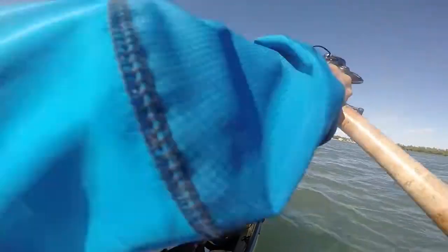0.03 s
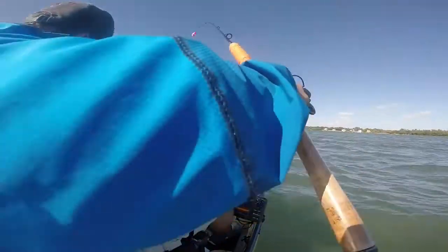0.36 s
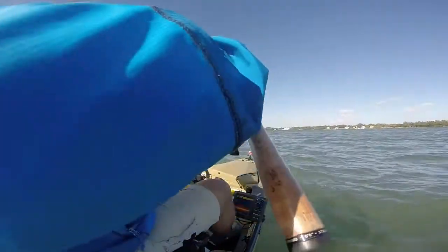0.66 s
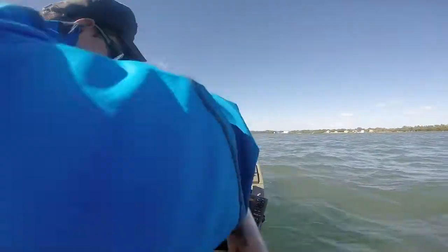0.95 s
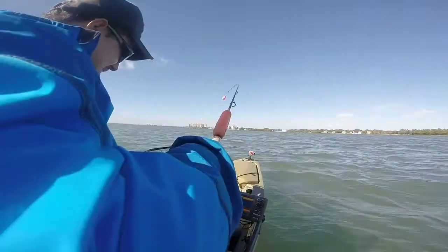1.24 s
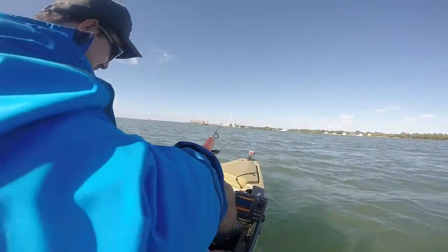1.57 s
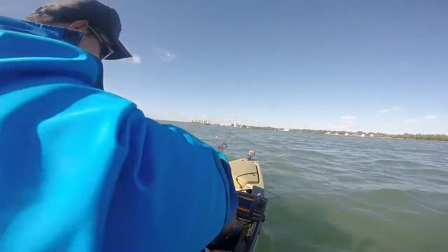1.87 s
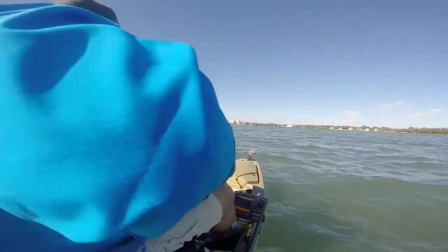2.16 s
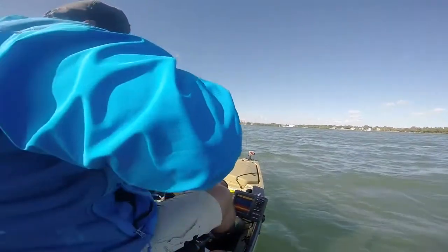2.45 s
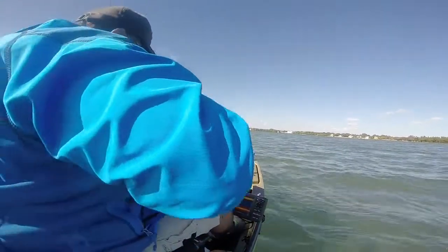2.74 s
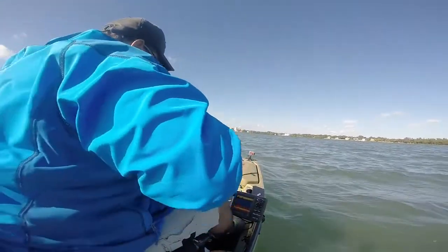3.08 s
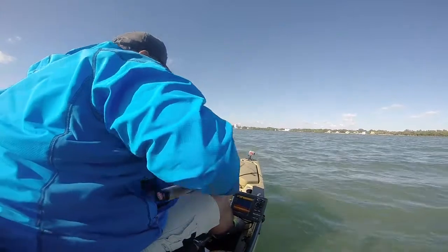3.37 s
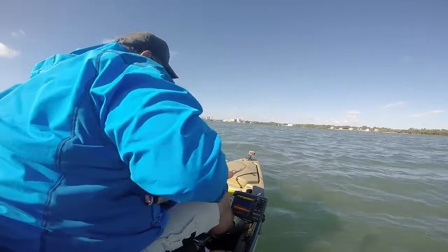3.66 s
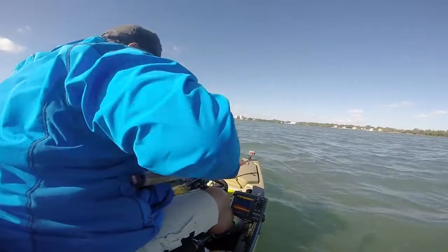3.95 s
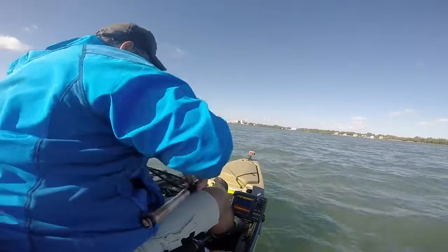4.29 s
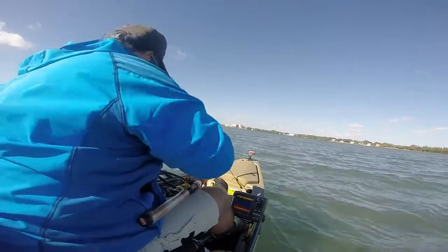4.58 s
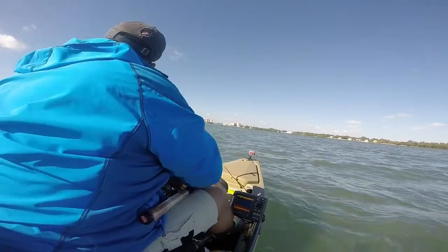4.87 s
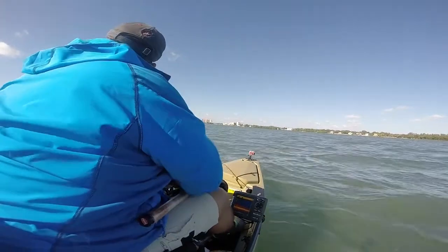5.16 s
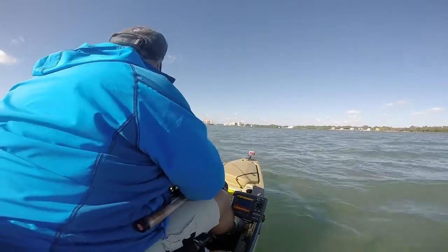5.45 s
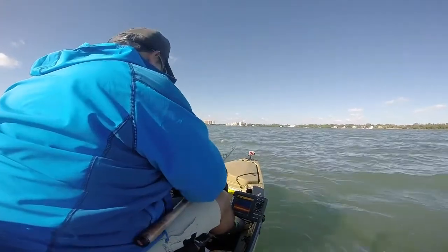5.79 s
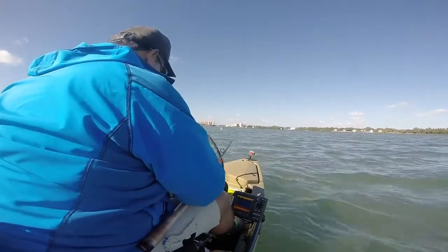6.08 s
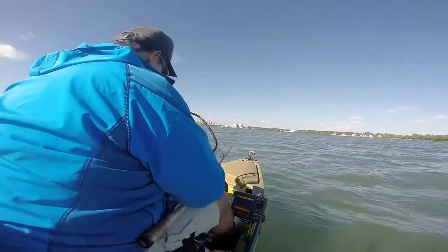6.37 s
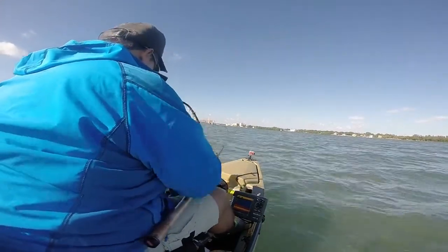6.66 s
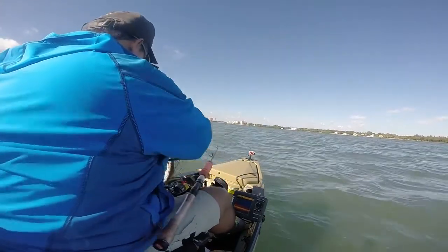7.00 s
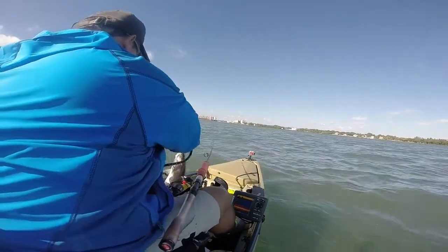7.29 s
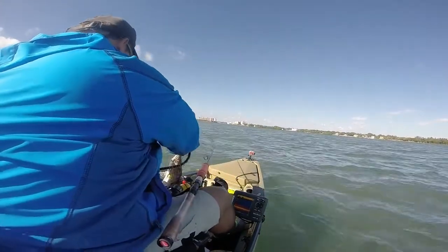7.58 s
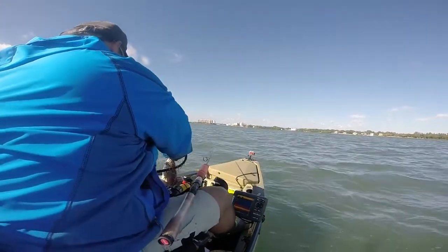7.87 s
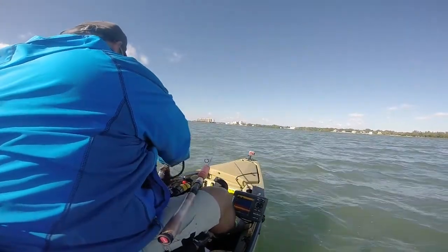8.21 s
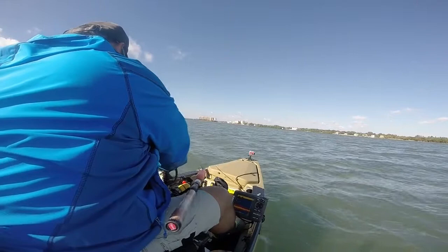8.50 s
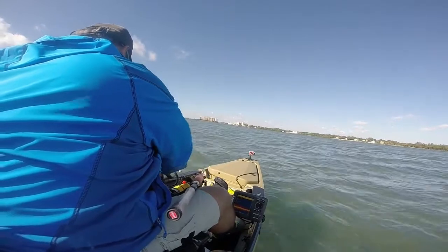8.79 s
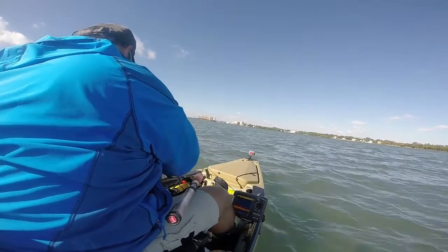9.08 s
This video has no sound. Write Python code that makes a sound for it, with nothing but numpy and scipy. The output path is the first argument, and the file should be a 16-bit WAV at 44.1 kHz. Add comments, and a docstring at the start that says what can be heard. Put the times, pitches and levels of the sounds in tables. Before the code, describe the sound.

Close to the microphone, a stiff jacket rustles and hard plastic fishing gear clicks as a wave gives a kayak hull a deep, hollow thump. Uneven slaps, sloshes and bubbles follow, busiest in the first half, with a few short scrapes of a rod. After a brief lull, the lapping and a few light clicks return. A soft wind hangs over the open water throughout.

```python
"""Kayak in choppy water

A plastic kayak sits in a low wind, heard from on board. Waves heave the hollow hull so that
it booms; wavelets slap and gurgle against its sides, and bubbles plink. Close by, a jacket
sleeve rustles, fishing gear clicks as it is handled and a rod slides over it."""
import sys
import numpy as np
from scipy import signal
from scipy.fft import rfft, irfft, next_fast_len
from scipy.io import wavfile
from scipy.ndimage import uniform_filter1d

SR = 44100
rng = np.random.default_rng(int(sys.argv[2]) if len(sys.argv) > 2 else 0)


def output_pcm(signal):
    """Save a mono or channel-first signal as 16-bit PCM at the path in sys.argv[1].

    Samples are clipped to [-1, 1] before scaling.
    """
    pcm = np.clip(np.atleast_2d(signal).T, -1, 1) * 32767
    wavfile.write(sys.argv[1], SR, np.round(pcm).astype(np.int16))


N = 407484
LEAD_S = .02  # room for the build-up before a blow


def from_db(db):
    return 10 ** (np.asarray(db) / 20)


def rms_one(x):
    """Scale a sound so that its average level (rms) is 1."""
    return x / np.sqrt(np.mean(x ** 2) + 1e-20)


def crest_one(x):
    """Scale a hit so that its loudest 4 ms have rms 1."""
    return x / np.sqrt(uniform_filter1d(x ** 2, size=SR // 250).max() + 1e-20)


def in_time(rows):
    """Join (time, value) points into a curve, sample by sample."""
    return np.interp(np.arange(N) / SR, *np.transpose(rows))


def add(out, s, sound):
    """Mix a sound in from second s on."""
    at = max(round(s * SR), 0)
    out[at:at + len(sound)] += sound[:max(N - at, 0)]


def band(x, low, high, order=2):
    """Keep what lies between two frequencies."""
    sos = signal.butter(order, [low, min(high, .45 * SR)], "band", fs=SR, output="sos")
    return signal.sosfilt(sos, x)


def around(x, hz, octaves, order):
    """Keep a range of some octaves around a pitch."""
    return band(x, hz * 2 ** (-octaves / 2), hz * 2 ** (octaves / 2), order)


def colour(x, spectrum):
    """Turn each frequency up or down along a curve."""
    hz, db = np.transpose(spectrum)
    bins = np.maximum(np.fft.rfftfreq(N, 1 / SR), 1)
    gain_db = np.interp(np.log(bins), np.log(hz), db)
    return irfft(rfft(x) * from_db(gain_db), N)


def drift(hz):
    """A smooth random wander of about 1 either way; more hz makes it quicker."""
    step = 40
    r = np.exp(-2 * np.pi * hz * step / SR)
    slow = signal.lfilter([1], [1, -2 * r, r * r], rng.standard_normal(N // step + 2002))[2000:]
    return np.interp(np.arange(N) / step, np.arange(len(slow)), rms_one(slow))


def swells(events, rise_s, fall_s, gain_db=0):
    """Power over time of (time, level) events that each swell and die away."""
    t, power = np.arange(0, N, 40) / SR, 0
    for s, db in events:
        fade = np.where(t < s, ((t - s) / rise_s) ** 2, (t - s) / fall_s)
        power = power + (from_db(db + gain_db) * np.exp(-fade)) ** 2
    return np.interp(np.arange(N) / SR, t, power)


def resonance(x, hz, width):
    """Ring at one pitch; the smaller the width in Hz, the longer the ring."""
    r = np.exp(-np.pi * width / SR)
    feedback = [1, -2 * r * np.cos(2 * np.pi * hz / SR), r * r]
    return signal.lfilter(np.array([1, 0, -1]) * (1 - r * r) / 2, feedback, x + 1e-18)


def body(x, tones, spread_db):
    """An object rings with many tones; where it is hit changes the strength of each."""
    return sum((-1) ** k * from_db(db + spread_db * rng.standard_normal()) * resonance(x, hz, width)
               for k, (hz, width, db) in enumerate(tones))


def grains(per_s, spread_db, size=N):
    """Tiny ticks at random moments, a few much larger than the rest."""
    heights = from_db(spread_db * np.minimum(rng.exponential(1, size), 4))
    signs = rng.choice([-1, 1], size)
    return heights * signs * (rng.random(size) < per_s / SR)


def blow(per_s, scatter, lead_s, decay_s, tail, tail_s):
    """Small contacts build up to the main one at LEAD_S, then die quickly into a faint tail."""
    t = np.arange(SR // 4) / SR - LEAD_S
    before = scatter * np.exp(-abs(t) / lead_s)
    after = scatter * np.exp(-abs(t) / decay_s) + tail * np.exp(-abs(t) / tail_s)
    force = grains(per_s, 3.37, len(t)) * np.where(t < 0, before, after)
    force[round(LEAD_S * SR)] = 1
    return force


# tone colour of wind and open water: f/Hz, level/dB
AIR_COLOUR = [(35, -19), (60, -9), (90, -17), (290, -19.5), (500, -22), (1400, -28.5), (3400, -33.5),
              (8700, -42.5), (9800, -43.5), (14500, -50.5)]
def air():
    """An even hush of wind and open water, with a faint rumble of gusts."""
    hush = colour(rng.standard_normal(N), AIR_COLOUR)
    hush = hush / np.std(band(hush, 1000, 15000))
    gusts = rms_one(band(rng.standard_normal(N), 13, 52)) * from_db(8.6 * drift(4.3))
    return from_db(-64.5) * hush + from_db(-62) * gusts


def flicker():
    """The treble flickers faintly, in short soft puffs of hiss."""
    cycle = (7.3 * np.arange(N) / SR + .12 * drift(3)) % 1
    puffs = uniform_filter1d(1. * (cycle < .26), size=300)
    noise = rng.standard_normal(N)
    hiss = resonance(noise, 9820, 660) + 0.14 * band(noise, 5300, 16000)
    return from_db(-69) * puffs * rms_one(hiss)


def boom(drive, hz, width, steady_s):
    """Wave pressure keeps one deep hull tone ringing, with the power that drives it."""
    ringing = resonance(resonance(rng.standard_normal(N + SR), hz, width), hz, 2 * width)
    # even out the ring's own random swings, so that it follows the drive
    outline = np.abs(signal.hilbert(ringing, next_fast_len(N + SR)))
    power = uniform_filter1d(outline ** 2, size=int(steady_s * SR) + 1) / 2
    return ringing[SR:] * np.sqrt(drive / power[SR:N + SR])


# how hard the choppy water rocks the boat: t/s, level/dB
CHOP = [(0.0, -37), (0.38, -48), (0.9, -47), (1.08, -38.5), (2.42, -44.5), (3.01, -51), (3.5, -51.5),
        (3.86, -37.5), (5.27, -51), (6.25, -35.5), (7.08, -61.5), (7.85, -48.5), (8.21, -62.5),
        (9.24, -39.5)]
# single waves shoving the hull: t/s, deep tone level/dB, upper tone against the deep one/dB
WAVES = [(0.09, -33, -17), (1.01, -13, -22), (1.32, -30.5, -17), (1.8, -31.5, -5.5), (2.06, -35, -12),
         (2.52, -21.5, -21), (2.88, -32.5, 1.5), (3.05, -25, -9.5), (3.16, -29, -27), (3.52, -51, 9.5),
         (3.73, -33, -25), (3.87, -29, -1.5), (4.02, -32, -21), (4.25, -43, -12), (4.71, -26.5, -27),
         (5.19, -43.5, -6), (5.551, -34, 1.5), (5.69, -36, -10.5), (6.042, -33, 4), (6.34, -33.5, -4.5),
         (6.62, -33.5, -10), (7.73, -44.5, -13), (8.702, -34, -1.5), (8.912, -42, 5.5), (9.1, -39.5, 1.5),
         (9.21, -25.5, -31)]
def heave():
    """The hollow hull booms at its two lowest tones, driven by chop, single waves and slaps."""
    chop_db = in_time(CHOP)
    thuds = swells([(s + LEAD_S, db) for s, db, *_ in SLAPS], rise_s=0.012, fall_s=0.047)
    shoves = swells([(s, db) for s, db, _ in WAVES], rise_s=0.042, fall_s=0.075)
    hard_shoves = swells([(s, db + hard_db) for s, db, hard_db in WAVES], rise_s=0.042, fall_s=0.061)
    deep = from_db(chop_db + 1.5) ** 2 + shoves + from_db(-16) ** 2 * thuds
    upper = from_db(chop_db - 9.5) ** 2 + hard_shoves + from_db(-8) ** 2 * thuds
    return (boom(deep, hz=49.9, width=6.8, steady_s=0.088)
            + boom(upper, hz=107.6, width=17, steady_s=0.098))


# rustle of the moving arm: t/s, level/dB
ARM_RUSTLE = [(0, -62), (0.52, -61.5), (0.72, -68), (0.9, -59), (1.25, -57), (1.62, -70), (2.2, -68),
              (2.95, -66.5), (3.85, -65.5), (4.03, -68), (4.22, -61.5), (4.65, -69), (5.3, -90)]
# quick scuffs of the sleeve against the jacket: t/s, level/dB
SCUFFS = [(0.01, -52), (0.245, -48), (0.39, -51.5), (0.48, -61), (0.8, -58), (2.96, -61.5)]
# tone colour of rubbing cloth: f/Hz, level/dB
CLOTH_COLOUR = [(900, -8.5), (2100, -3), (2700, 9), (3500, -5), (4650, 7.5), (5250, -2), (5850, 12.5),
                (6800, 3.5), (8300, -4.5), (10300, -1), (14000, -17)]
def sleeve():
    """Stiff cloth scuffs in clumps of tiny snaps, and is silent when the arm rests."""
    arm_db = in_time(ARM_RUSTLE)
    moving = np.clip((arm_db + 74) / 10, 0, 1)
    scuffs = swells(SCUFFS, rise_s=0.016, fall_s=0.027)
    rubbing = np.sqrt((from_db(arm_db) * moving) ** 2 + scuffs)
    clumps = from_db(2.5 * drift(12) + 3.5 * drift(90))
    snaps = grains(per_s=2600, spread_db=4.5) * clumps
    return rubbing * rms_one(colour(snaps, CLOTH_COLOUR))


# water sloshing along the side: t/s, level/dB
SLOSHES = [(0.02, -46.5), (0.11, -47.5), (0.27, -58), (0.96, -49.5), (1.55, -50.5), (2.43, -46),
           (2.95, -47), (3.26, -45.5), (3.57, -52.5), (3.87, -52), (6.07, -59.5), (6.63, -62.5),
           (8.69, -57), (8.95, -54)]
# tones of the hull's panels and hollows, also rung by slaps: f/Hz, width/Hz, level/dB
HULL_TONES = [(160.6, 9.7, 7), (224.6, 48, 2.5), (285, 20.8, 3.5), (367.7, 34, -6), (435.5, 25.4, -4),
              (614.5, 48, -1), (692, 110, -25), (856, 71, 2.5), (981, 37, -3), (1064, 9.5, -4.5),
              (1202, 144, -1.5), (1270, 560, -11.5), (1677, 59, 1), (1950, 48, -24), (2155, 150, -10.5),
              (2913, 60, 7.5)]
def wash():
    """Water gurgles and tiny bubbles trickle: with the chop, in sloshes, and as each slap runs off."""
    chop_db = in_time(CHOP)
    stir_db = 0.42 * (chop_db - chop_db.mean())
    sloshes = swells(SLOSHES, rise_s=0.064, fall_s=0.076)
    delay_s, rise_s, fall_s = 0.0067, 0.023, 0.1  # water running off after a slap
    thud_runoff = swells([(s + delay_s, db) for s, db, *_ in SLAPS], rise_s, fall_s, gain_db=-19)
    clop_runoff = swells([(s + delay_s, db) for s, _, db, *_ in SLAPS], rise_s, fall_s, gain_db=-25.5)
    gurgle_level = np.sqrt(from_db(stir_db - 61) ** 2 + thud_runoff + sloshes)
    trickle_level = np.sqrt(from_db(stir_db - 72.5) ** 2 + clop_runoff + from_db(-6.5) ** 2 * sloshes)
    lapping = from_db(2.5 * drift(8))
    ringing = body(grains(per_s=250, spread_db=3.5), HULL_TONES, spread_db=0)
    gurgle = rms_one(band(ringing, 130, 520, order=3))
    tiny_bubbles = sum(resonance(grains(per_s=30, spread_db=3.5), hz, hz / 12) * (900 / hz) ** 1.3
                       for hz in np.geomspace(650, 2300, 14))
    trickle = rms_one(band(tiny_bubbles, 625, 4000))
    return lapping * (gurgle_level * gurgle + trickle_level * trickle)


# clicks of gear being handled: t/s, level/dB, f/Hz
CLICKS = [(0.1425, -41, 8060), (0.271, -47.5, 8800), (0.453, -37, 7400), (0.4858, -45, 9050),
          (0.532, -50, 9000), (0.617, -50.5, 9550), (0.7912, -45.5, 7100), (0.8757, -44, 4570),
          (0.986, -44, 3970), (1.031, -34, 4800), (1.1112, -46, 8300), (1.205, -46, 6500),
          (1.267, -48, 7500), (1.514, -48.5, 4020), (1.748, -44, 3240), (1.998, -46, 4460),
          (2.27, -50, 4440), (3.6763, -53, 3820), (5.3984, -44.5, 2530), (6.1286, -54.5, 8000),
          (8.6716, -54.5, 4030), (8.6922, -46, 6270), (8.8128, -55, 6170)]
# tones of the gear's hard plastic: f/Hz, width/Hz, level/dB
GEAR_TONES = [(1180, 100, 40), (2320, 430, 22.5), (2820, 197, 20), (3820, 114, 10), (3800, 190, -9),
              (4660, 180, 11.5), (5240, 210, -10), (5730, 440, 12), (5930, 170, 19), (7050, 200, 7),
              (8000, 100, 0.5), (10370, 300, 1), (12000, 2300, -8)]
def gear():
    """Hard parts touch and chatter for an instant; each click rings around its own pitch."""
    out = np.zeros(N)
    for s, db, hz in CLICKS:
        force = blow(per_s=7300, scatter=0.69, lead_s=0.0016, decay_s=0.0051, tail=0.052, tail_s=0.043)
        ringing = body(force, GEAR_TONES, spread_db=1)
        click = crest_one(around(ringing, hz, octaves=1.42, order=3))
        add(out, s - LEAD_S, from_db(db - 0.5) * click)
    return out


# wavelets slapping: t/s, hull thud level/dB, water clop level/dB, clop f/Hz, trapped air f/Hz
SLAPS = [(0.25, -36.5, -36.5, 780, 230.5), (0.389, -54, -44.5, 900, 270), (0.705, -42, -43, 1250, 227),
         (0.803, -47, -42.5, 1480, 267), (1.012, -28.5, -41, 990, 221.5), (1.732, -27, -31.5, 607, 235),
         (1.747, -43, -28, 1410, 288), (2.087, -40, -41, 790, 282), (2.383, -32.5, -30.5, 1130, 278.3),
         (2.753, -40.5, -41.5, 1920, 226.4), (2.793, -54, -39, 724, 277), (2.846, -29, -47, 795, 232),
         (2.886, -43, -37.5, 910, 209), (2.909, -50, -31.5, 1390, 241), (2.973, -40, -38.5, 1430, 267),
         (3.216, -33, -30.5, 1400, 216.5), (3.318, -42, -46, 1520, 277), (3.513, -44, -42.5, 1200, 277),
         (3.591, -42, -34, 1500, 271), (3.805, -26, -32.5, 600, 406), (4.234, -41, -37, 1160, 257),
         (4.578, -29, -38.5, 1520, 313), (4.606, -33.5, -34, 554, 229), (4.664, -40, -44.5, 680, 304),
         (4.808, -40.5, -38.5, 514, 207), (4.932, -55, -47.5, 1390, 207), (5.078, -40.5, -46.5, 1270, 218),
         (5.142, -52, -44, 1400, 231), (5.483, -42, -37, 950, 232), (5.563, -40.5, -46, 740, 214),
         (6.02, -37, -47, 930, 232), (6.561, -32.5, -33.5, 1130, 220), (7.535, -49, -39.5, 950, 270),
         (7.682, -39.5, -47, 645, 208.7), (8.887, -33, -36, 680, 227), (9.189, -33, -40, 645, 420)]
def slaps():
    """Each wavelet climbs the side, closes on a pocket of air and strikes the hull."""
    out = np.zeros(N)
    split_hz = 476  # thud below, clop above
    for s, thud_db, clop_db, clop_hz, pocket_hz in SLAPS:
        # a heavy, dull wave builds up and falls back more slowly than a light, bright one
        slowness = np.clip(1 + 0.052 * (thud_db - clop_db), .6, 1.5)
        force = blow(per_s=3200, scatter=0.19, lead_s=0.0019 * slowness, decay_s=0.0083 * slowness,
                     tail=0.0049, tail_s=0.12)
        ringing = body(force, HULL_TONES, spread_db=1.5)
        thud = band(ringing, 168, split_hz, order=4)
        clop = band(around(ringing, clop_hz, octaves=0.98, order=2), split_hz, 2330, order=6)
        slap = from_db(thud_db - 3) * crest_one(thud) + from_db(clop_db - 1.5) * crest_one(clop)
        add(out, s - LEAD_S - .001, slap)
        add(out, s, from_db(thud_db - 6) * plink(pocket_hz, rise=0.059, cycles=4.7))
    return out


def plink(hz, rise, cycles):
    """A pocket of air rings for some cycles, rising in pitch as it nears the surface."""
    turns = hz * np.arange(SR // 8) / SR
    glide = 1 + rise * np.tanh(turns / cycles - 1)
    tone = np.sin(2 * np.pi * np.cumsum(hz * glide) / SR)
    return crest_one(tone * (1 - np.exp(-turns)) * np.exp(-turns / cycles))


# single bubbles plinking: t/s, f/Hz, level/dB
PLINKS = [(1.553, 303, -46.5), (2.167, 1660, -49), (2.227, 896, -50.5), (2.824, 1655, -42.5),
          (3.056, 2190, -49.5), (3.831, 908, -35), (3.869, 2200, -52.5), (5.651, 1115, -58),
          (6.484, 2350, -53.5), (6.635, 970, -48.5), (6.907, 914, -52.5)]
def bubbles():
    """Lone bubbles pinch off beside the hull."""
    out = np.zeros(N)
    for s, hz, db in PLINKS:
        add(out, s, from_db(db) * plink(hz, rise=0.023, cycles=9.2))
    return out


# the rod sliding over gear: start t/s, end t/s, level/dB
SLIDES = [(3.121, 3.27, -59), (3.753, 3.815, -51.5), (4.139, 4.216, -46.5), (4.561, 4.617, -54.5)]
# tones of the rod and its holder: f/Hz, width/Hz, level/dB
ROD_TONES = [(1000, 290, 11.5), (1460, 170, -5), (2130, 200, -10), (2820, 140, 7.5), (3060, 250, -1),
             (4600, 440, 5.5), (5380, 120, -8), (5670, 260, -6), (6920, 640, -5), (9600, 5200, -19.5)]
def rod():
    """The sliding rod catches and slips thousands of times a second."""
    t, pressure = np.arange(N) / SR, 0
    grip_s, release_s = 0.0048, 0.012
    for start, end, db in SLIDES:
        grip = np.clip((t - start) / grip_s, 0, 1)
        release = np.exp(-np.maximum(t - end, 0) / release_s)
        pressure = pressure + from_db(db) * grip * release
    slips = grains(per_s=4000, spread_db=2) * from_db(3.4 * drift(53))
    return pressure * rms_one(body(slips, ROD_TONES, spread_db=0))


def scene():
    """Water, handling and wind, added into one channel."""
    water = heave() + slaps() + bubbles() + wash()
    handling = gear() + rod() + sleeve()
    return (water + handling + air() + flicker())[None]


def record(dry):
    """The highest treble is cut steeply, and the sound ends without a click."""
    cutoff_hz, fade_s = 15200, .004
    fade_out = np.minimum(np.arange(N)[::-1] / (fade_s * SR), 1)
    return signal.sosfilt(signal.ellip(10, .1, 80, cutoff_hz, fs=SR, output="sos"), dry * fade_out)


dry = scene()
out = record(dry)
output_pcm(out)
```